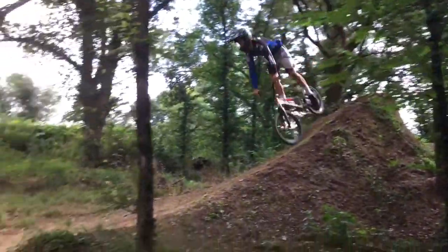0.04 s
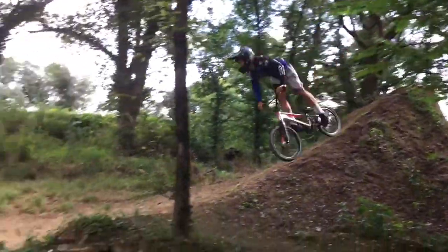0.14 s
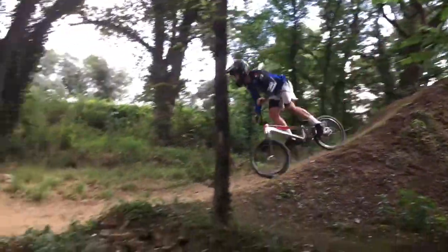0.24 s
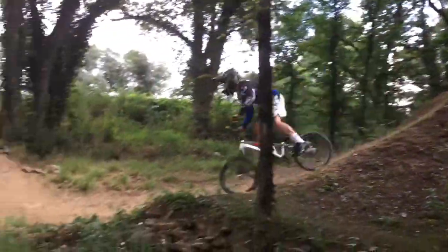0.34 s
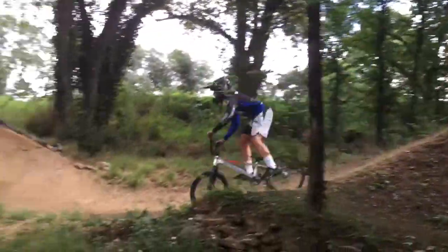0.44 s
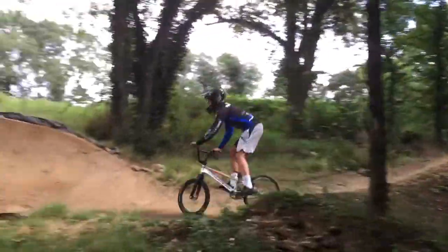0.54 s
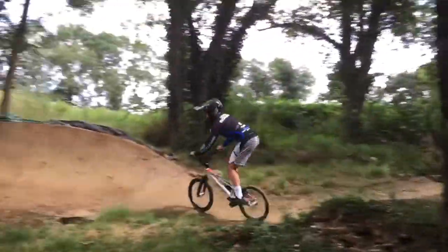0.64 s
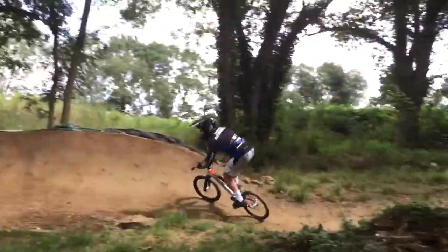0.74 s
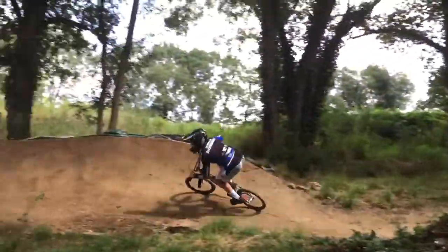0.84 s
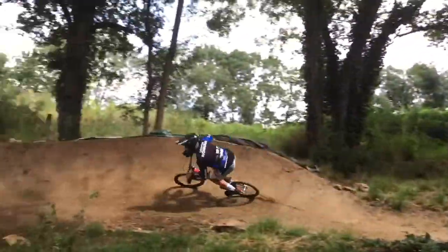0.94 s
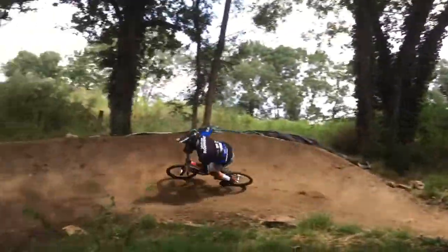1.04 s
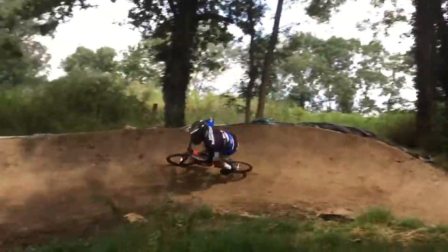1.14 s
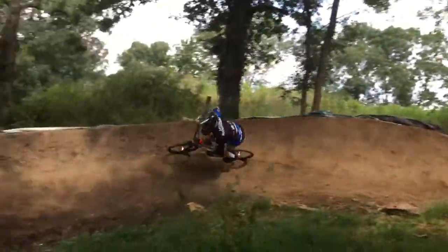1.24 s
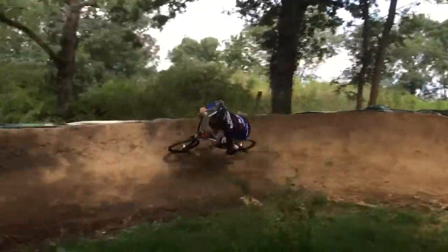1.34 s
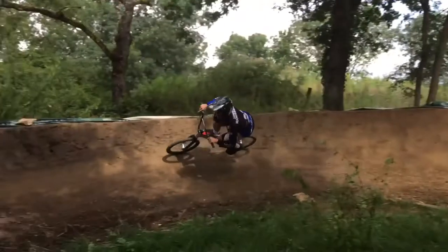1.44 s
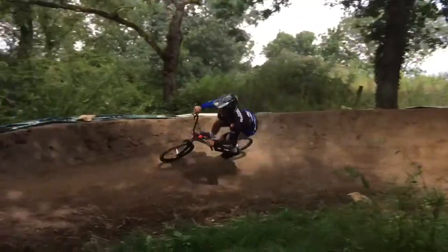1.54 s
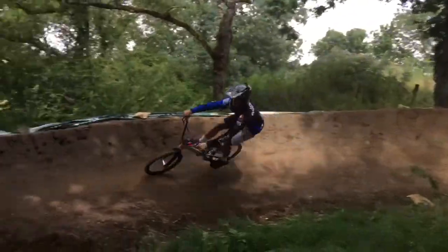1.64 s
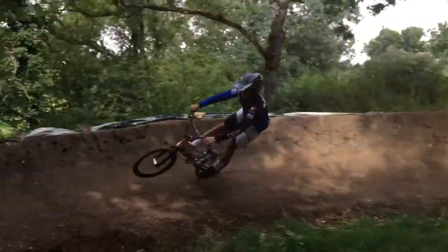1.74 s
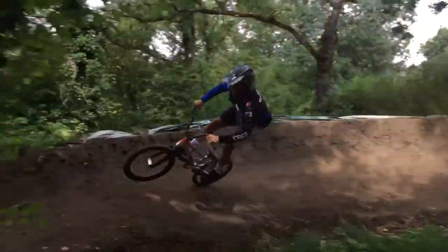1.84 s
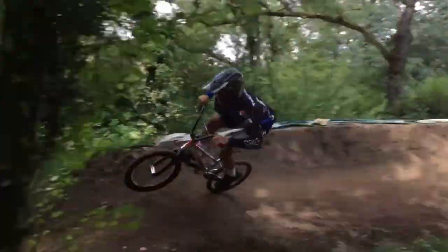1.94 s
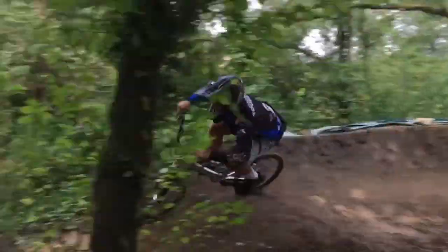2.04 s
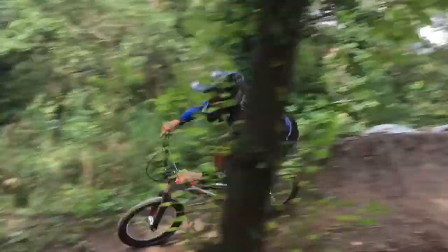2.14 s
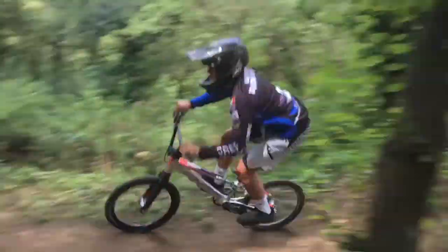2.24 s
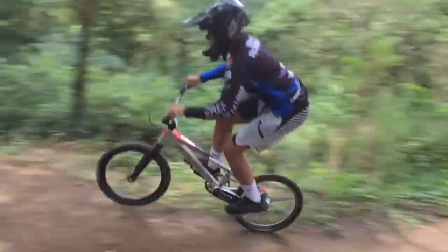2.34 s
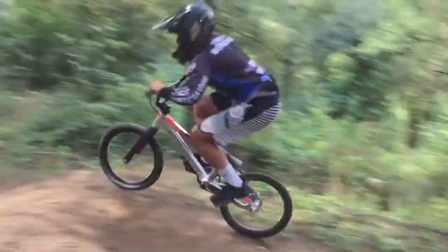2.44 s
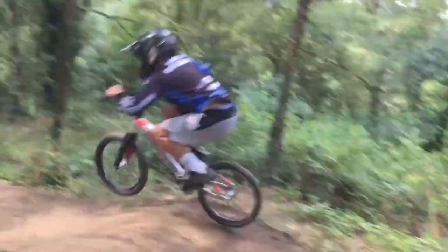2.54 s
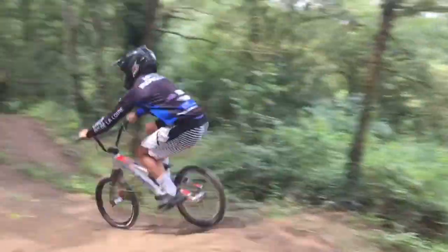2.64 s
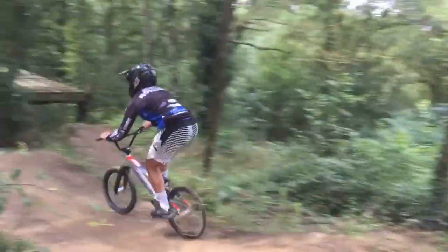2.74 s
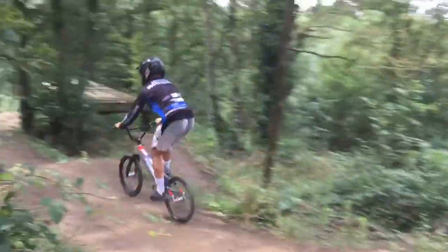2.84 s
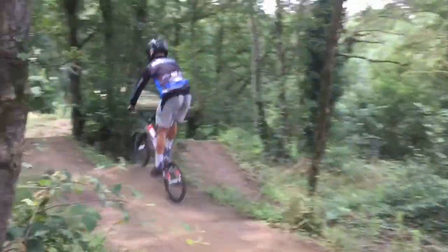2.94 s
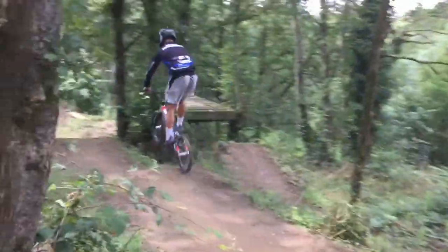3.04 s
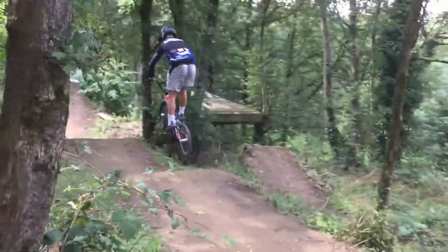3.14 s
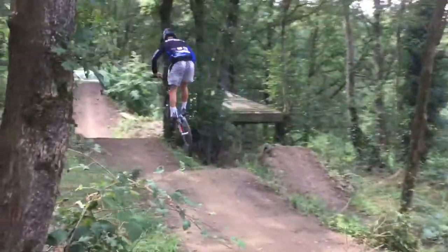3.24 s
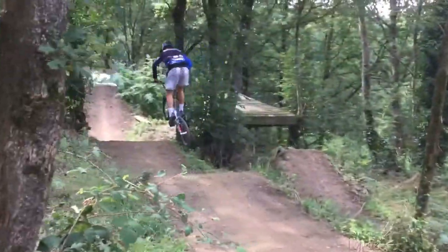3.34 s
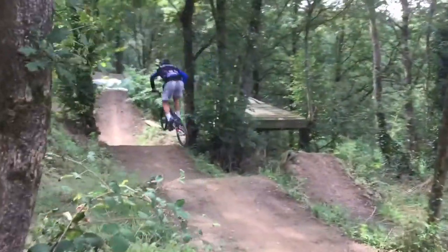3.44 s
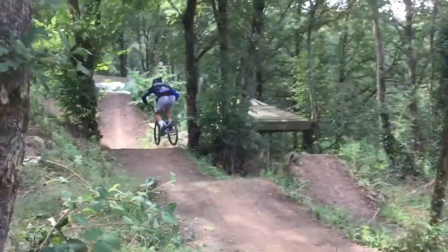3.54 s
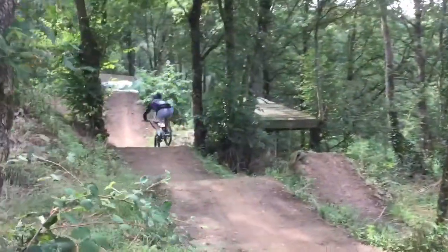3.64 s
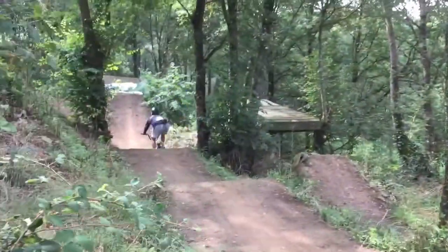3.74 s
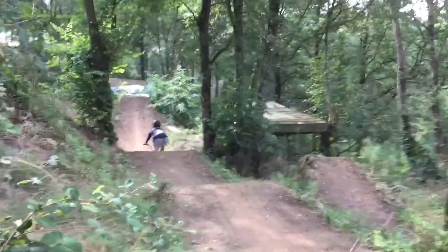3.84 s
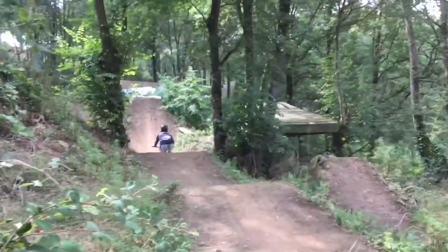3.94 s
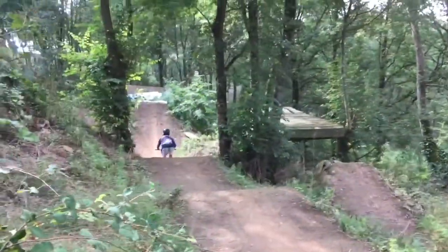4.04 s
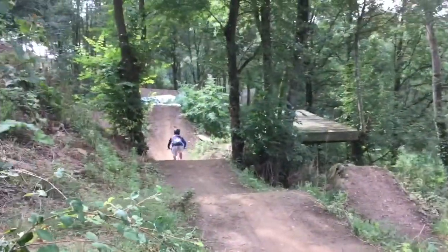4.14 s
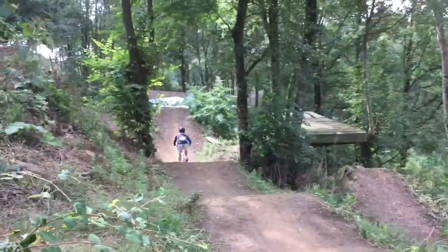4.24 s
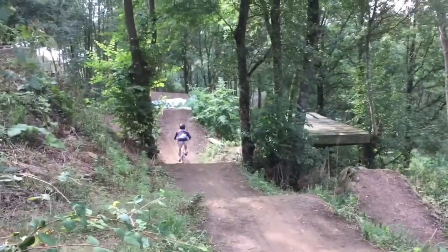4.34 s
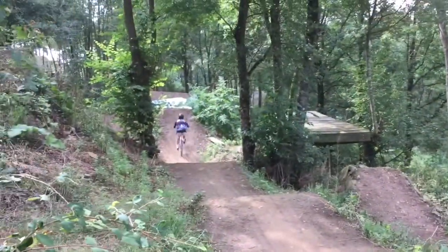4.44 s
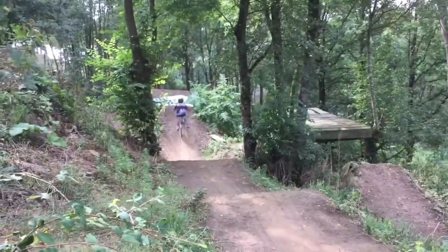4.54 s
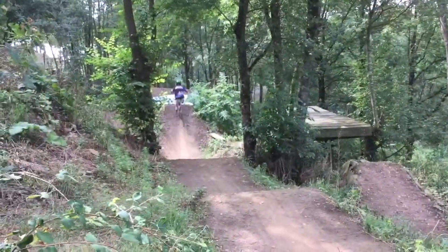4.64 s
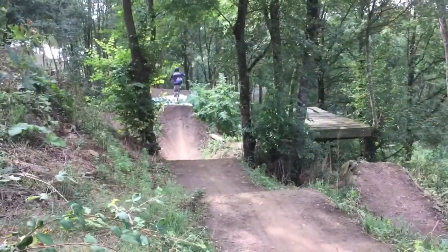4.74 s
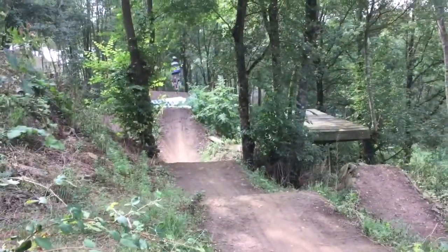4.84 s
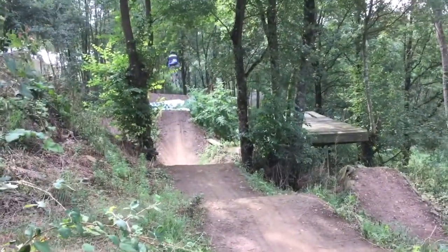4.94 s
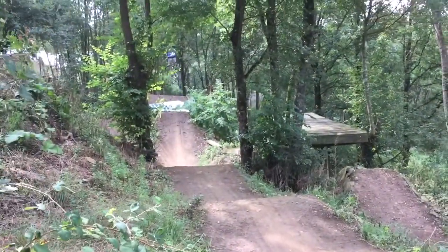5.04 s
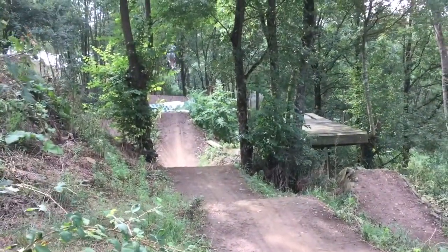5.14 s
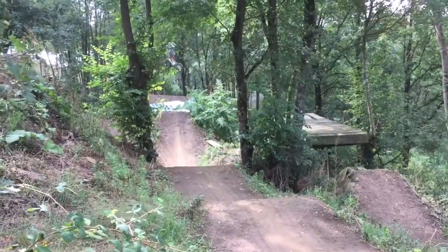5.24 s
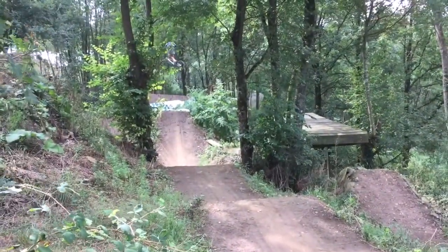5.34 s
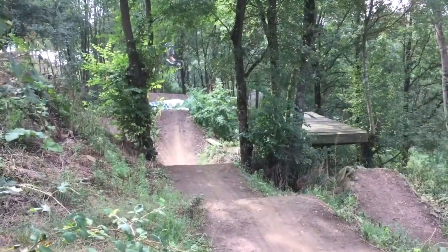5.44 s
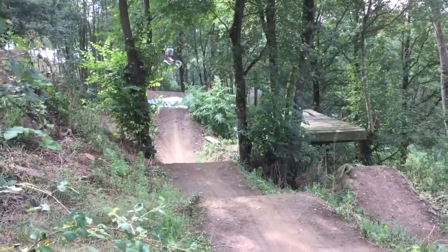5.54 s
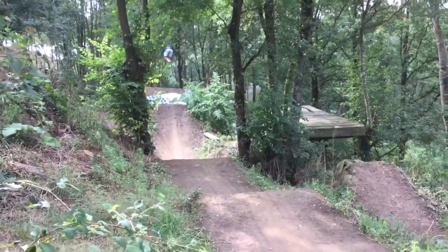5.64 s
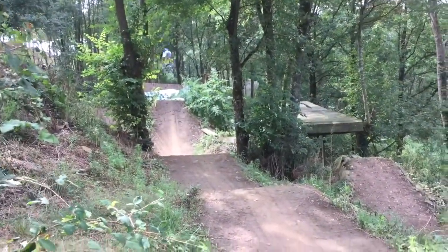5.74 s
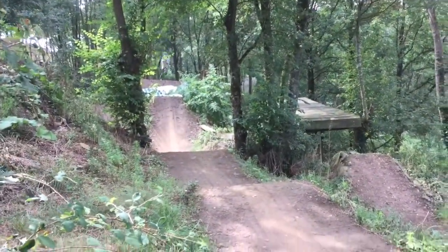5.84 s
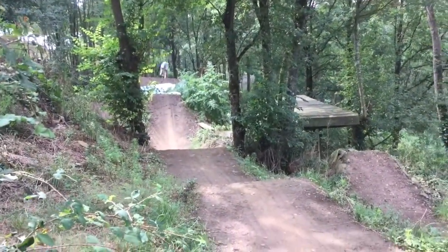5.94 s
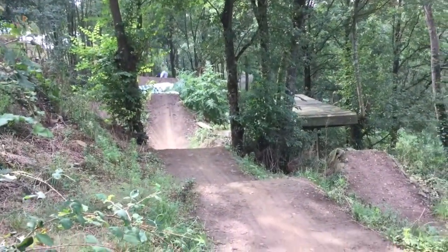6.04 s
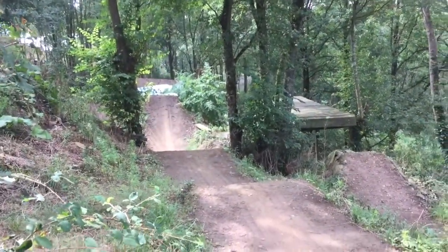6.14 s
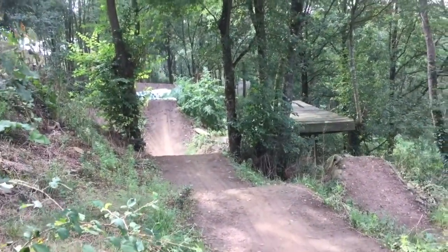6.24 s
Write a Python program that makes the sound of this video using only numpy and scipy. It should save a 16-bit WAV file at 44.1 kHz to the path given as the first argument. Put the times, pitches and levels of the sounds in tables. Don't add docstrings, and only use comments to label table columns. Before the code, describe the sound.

In a quiet wood, a bike lands on packed dirt with a thump and coasts in, freewheel buzzing brightly, tyres rumbling and crunching. Chain and frame clack over bumps. It passes close at its loudest, the buzz dropping in pitch, then hops away over jumps with lighter knocks until only faint leaf hiss remains. One outdoor microphone, slight breeze puffs, dull echoes from trees.

```python
import sys
import numpy as np
from scipy import signal
from scipy.fft import rfft, irfft
from scipy.io import wavfile
from scipy.ndimage import uniform_filter1d

SR = 44100
rng = np.random.default_rng(int(sys.argv[2]) if len(sys.argv) > 2 else 0)


def decibels_to_gain(level_db):
    exponent = np.asarray(level_db, float) / 20
    return 10 ** exponent


def output_pcm(signal):
    pcm = np.clip(np.atleast_2d(signal).T, -1, 1) * 32767
    wavfile.write(sys.argv[1], SR, np.round(pcm).astype(np.int16))


N = 276903
STEP = 32
RIM_FOLLOWS_LOAD = 0.51

# (time [s], ratchet level [dB], hub turned to the microphone [dB], loose dirt thrown up [dB])
PASSING = [(0, -63, 3, 1.5), (.16, -60.5, 5, 4), (.28, -50, -3, -0.5), (.46, -50, 3, 3.5), (.6, -53, 2, 3),
           (1.24, -54, 2, 2), (1.7, -48.5, -1.5, -0.5), (2.1, -52, 3, 3), (2.18, -46.5, 0.5, 3),
           (2.33, -42, -1, -0.5), (3.0, -46, -3, -1), (3.27, -54, 1, 0.5), (3.67, -59, 0.5, 2.5),
           (3.77, -52.5, -2, 1), (3.94, -65, -0.5, 0), (4.31, -74, 6, 7), (4.69, -54.5, -6.5, 2),
           (4.8, -60.5, -3, 5)]
FAR = [
    (4.89, -67.5, -1, 9),
    (4.95, -90, 1, 1),
    (5.35, -95, -4, 2),
    (5.5, -73.5, -16, -4),
    (5.75, -80, -3, -0.5),
    (6.1, -98, -4, 11),
    (6.16, -89, -12, 10),
    (6.23, -81, -11, 11),
    (6.28, -65, -20, 3),
]


def rms_one(x):
    return x / np.sqrt(np.mean(x ** 2) + 1e-20)


def peak_one(x):
    return x / np.abs(x).max()


def add(out, x, s):
    i = round(s * SR)
    out[i:i + len(x)] += x[:N - i]


def in_time(rows):
    s, *columns = np.transpose(rows)
    return [np.interp(np.arange(N) / SR, s, column) for column in columns]


def both(a_db, b_db):
    return 20 * np.log10(np.hypot(decibels_to_gain(a_db), decibels_to_gain(b_db)))


def level(power):
    return np.interp(np.arange(N), np.arange(0, N, STEP), 10 * np.log10(power + 1e-14))


def tent(start, end, rise_db_per_s, fall_db_per_s):
    t = np.arange(0, N, STEP) / SR
    return -rise_db_per_s * np.maximum(start - t, 0) - fall_db_per_s * np.maximum(t - end, 0)


def swells(rows, rises_faster):
    return sum(decibels_to_gain(db + tent(s, s, rises_faster * fade, fade)) ** 2 for s, db, fade in rows)


def drift(rate):
    r = np.exp(-80 * np.pi * rate / SR)
    noise = rng.standard_normal(N // 40 + 2002)
    slow = signal.lfilter([1], [1, -2 * r, r * r], noise)[2000:]
    return np.interp(np.arange(N) / 40, np.arange(len(slow)), rms_one(slow))


def resonance(x, hz, width):
    r = np.exp(-np.pi * width / SR)
    poles = [1, -2 * r * np.cos(2 * np.pi * hz / SR), r * r]
    return signal.lfilter((1 - r * r) / 2 * np.array([1, 0, -1]), poles, x)


def grains(per_s, spread_db):
    sizes = decibels_to_gain(spread_db * np.minimum(rng.exponential(1, N), 4)) * rng.choice([-1, 1], N)
    return rms_one(sizes * (rng.random(N) < per_s / SR)) + 1e-9


def body(drive, modes, flicker_db, flicker_rate):
    total = np.zeros(N)
    for k, (hz, width, db) in enumerate(modes):
        gain = decibels_to_gain(db + flicker_db * drift(flicker_rate))
        total += resonance(drive, hz, width) * gain * (-1) ** k
    return rms_one(total)


def burst(length, chatter):
    size = SR // 8
    fade = decibels_to_gain(-60 * np.arange(size) / SR / np.clip(length, .004, .2))
    drive = chatter * rng.standard_normal(size) * fade
    drive[0] += 1
    return drive


def wood():
    # (frequency [Hz], density [dB per Hz])
    spectrum = [(40, 16), (120, 1), (204, -4.5), (333, -6.5), (368, -2), (416, -6.5), (589, -6), (737, -6),
                (1040, -6.5), (1130, -7), (1570, -12), (1700, -11.5), (15700, -26)]
    hz, db = np.transpose(spectrum)
    grid = np.arange(N // 2 + 1) * SR / N + 1
    shape = decibels_to_gain(np.interp(np.log(grid), np.log(hz), db, left=-90, right=-90))
    return rms_one(irfft(rfft(rng.standard_normal(N)) * shape, N)) * decibels_to_gain(-71)


def freewheel():
    # (time [s], speed towards the microphone [m/s])
    approach = [
        (0, 0),
        (1.4, 2),
        (2.25, 6),
        (2.95, -6),
        (6.28, -6),
    ]
    # (frequency [Hz], width [Hz], level [dB])
    hub_modes = [(5380, 670, -2.5), (6100, 330, -3.5), (6865, 290, 2.5), (8460, 750, -5.5),
                 (9840, 1330, -11)]
    hub_top = [(11280, 660, -6), (12100, 330, -4), (13000, 1030, -7.5), (14440, 210, 3),
               (15330, 1070, -4.5), (15800, 560, -2)]
    hub_low = [(2594, 280, 7), (2320, 440, 2)]
    # (time [s], peak level [dB], fade [dB/s])
    singing = [
        (.1, -61.5, 34),
        (.29, -48, 100),
        (.95, -57.5, 18),
        (2.28, -45, 100),
        (2.73, -52, 200),
        (4.68, -51, 91),
        (6.16, -73, 60),
    ]
    sound_speed = 343
    ratchet_db, top_db, dirt_db = in_time(PASSING + FAR)

    dirt_ring_db = -6.5 + 0.21 * dirt_db
    load_ring_db = RIM_FOLLOWS_LOAD * (load()[0] - ratchet_db) - 8.5
    low_db = both(dirt_ring_db, load_ring_db)
    low_db = both(low_db, level(swells(singing, 1.24)) - ratchet_db)

    teeth_per_s = 170 * decibels_to_gain(0.83 * drift(2.55))
    teeth = np.cumsum(teeth_per_s / SR + 0.0051 * rng.standard_normal(N))
    pawls = decibels_to_gain(0.5 * np.cos(2 * np.pi * teeth))
    drive = grains(12000, 2.3) * pawls
    shell = body(drive, hub_modes, 1.8, 20) + decibels_to_gain(top_db) * body(drive, hub_top, 1.2, 20)
    shell += decibels_to_gain(low_db - 2.0) * body(drive, hub_low, 3.6, 13.5)

    emitted = np.cumsum(1 + in_time(approach)[0] / sound_speed)
    fine = signal.resample_poly(shell, 4, 1)
    return decibels_to_gain(ratchet_db) * np.interp(4 * emitted, np.arange(len(fine)), fine)


def breeze():
    # (time [s], peak level [dB], fade [dB/s])
    gusts = [(.03, -62, 28), (.26, -40, 124), (.44, -50, 250), (.52, -49, 39), (.85, -54, 27),
             (1.06, -52.5, 108), (1.27, -49.5, 200), (1.4, -49, 150), (1.55, -55, 80), (1.7, -54.5, 88),
             (1.82, -48, 152), (2.11, -49, 300), (2.225, -35.5, 202), (2.3, -48, 102), (2.6, -56, 180),
             (2.775, -43.5, 300), (2.89, -49.5, 350), (3.88, -54, 137), (4.07, -62, 120), (4.351, -63, 90),
             (4.6, -60, 104), (4.79, -61, 250), (4.91, -63, 246), (5.04, -65, 350), (5.459, -54, 309),
             (5.55, -62, 200), (5.61, -58.5, 220), (5.97, -64, 208), (6.16, -51.5, 220), (6.26, -47, 600)]
    calm_db, rises_faster = -77.5, 1.97
    puffs = rng.standard_normal(N)
    for hz, width in [(76, 36), (48, 70), (62, 130)]:
        puffs = resonance(puffs, hz, width)
    puffs = rms_one(puffs)
    swing = np.sqrt(uniform_filter1d(puffs ** 2, size=1400) + .1)
    return rms_one(puffs / swing) * decibels_to_gain(level(swells(gusts, rises_faster) + decibels_to_gain(calm_db) ** 2))


def load():
    # (touch time [s], lift time [s], load at touch [dB], load at lift [dB], hollowness [dB])
    contacts = [(0.183, .26, -58, -51, 4), (0.276, 0.623, -46, -47, -6.5), (0.595, 1.188, -50.5, -48.5, 1),
                (1.213, 1.36, -54, -46.5, -3), (1.379, 1.6, -46.5, -52.5, -0.5),
                (1.646, 1.866, -49, -49, 1), (1.896, 2.164, -57, -60, -0.5), (2.2, 2.478, -36.5, -44.5, 0),
                (2.54, 2.62, -75, -58.5, 10), (2.766, 3.04, -43, -48, -1), (3.052, 3.158, -55, -56.5, -2.5),
                (3.18, 3.27, -61, -63, -16), (3.766, 4.103, -57.5, -55, -16.5),
                (4.115, 4.42, -66.5, -60.5, -12.5), (4.429, 4.512, -61.5, -50, -24),
                (4.538, 4.774, -46, -52.5, -14), (6.144, 6.282, -82.5, -61.5, 2.5)]
    # (time [s], peak level [dB], fade [dB/s])
    ripples = [(.25, -47.5, 110), (.41, -40, 150), (.56, -45.5, 80), (1.14, -63, 123), (1.52, -42.5, 116),
               (1.69, -51, 120), (1.82, -45.5, 150), (2.08, -53.5, 90), (2.24, -45.5, 74), (2.44, -50, 150),
               (2.54, -43, 154), (2.62, -47, 209), (2.81, -58, 104), (3.06, -51, 200), (3.12, -63, 200),
               (3.77, -57, 197), (3.95, -55, 250), (4.53, -53.5, 150), (5.02, -68.5, 200), (5.98, -79, 98),
               (4.66, -56.5, 90)]
    touch_db_per_s, lift_db_per_s = 1500, 284
    t = np.arange(0, N, STEP) / SR
    plain, hollow = 0, swells(ripples, 2.02)
    for touch, lift, touch_db, lift_db, hollow_db in contacts:
        press_db = np.interp(t, [touch, lift], [touch_db, lift_db])
        press = decibels_to_gain(press_db + tent(touch, lift, touch_db_per_s, lift_db_per_s)) ** 2
        plain = plain + press
        hollow = hollow + press * decibels_to_gain(hollow_db) ** 2
    return level(plain), level(hollow)


def tyres():
    # (frequency [Hz], width [Hz], level [dB])
    tread_modes = [(468, 26, -2), (573.5, 61, 3.5), (694, 110, 2.5), (846, 270, 0), (1141, 121, -2)]
    rim_modes = [(1378, 218, -1), (1840, 420, 0), (1976, 130, 2)]
    chamber_modes = [(141, 54, 2), (195.4, 20, 9), (243, 41, 3), (303, 596, -4)]
    grit_modes = [(2817, 150, -4.5), (3230, 294, -0.5), (3850, 590, -1.5), (4440, 262, -2),
                  (4790, 230, -13)]
    load_db, hollow_db = load()
    ratchet_db, _, dirt_db = in_time(PASSING + FAR)

    mid_db, tread_follows = -39, 0.89
    free_db = mid_db + tread_follows * (ratchet_db - mid_db)
    rumble_db = both(load_db, free_db - 19)
    hum_db = both(hollow_db, free_db - 23.5)
    rim_loaded_db = ratchet_db + RIM_FOLLOWS_LOAD * (load_db - ratchet_db) - 6.5
    rim_db = both(rim_loaded_db, free_db - 14)
    crunch_db = both(load_db - 8.5, ratchet_db + dirt_db)

    bumps = 1.1 * drift(25)
    stones = grains(3500, 3.2)
    tread = body(stones, tread_modes, 2.0, 14) * decibels_to_gain(rumble_db + bumps)
    rim = body(stones, rim_modes, 1.8, 14) * decibels_to_gain(rim_db + bumps)
    air = body(grains(900, 2.6), chamber_modes, 1.3, 12)
    swing = np.sqrt(uniform_filter1d(air ** 2, size=2000) + .15)
    hum = rms_one(air / swing) * decibels_to_gain(hum_db + .6 * bumps)
    grit = body(grains(7000, 2.6), grit_modes, 1.3, 18) * decibels_to_gain(crunch_db + .6 * bumps)
    return tread + rim + hum + grit


def knocks():
    # (time [s], peak level [dB], ring [Hz], upper modes [dB])
    blows = [(0.184, -44, 825, 5.5), (0.245, -33, 1110, 0), (0.266, -28.5, 910, -0.5),
             (0.282, -30.5, 900, -18), (0.545, -33, 960, -26), (0.665, -40, 684, 2),
             (0.959, -33, 940, -3.5), (1.407, -36.5, 846, 0), (1.587, -38, 820, -9), (1.698, -34, 886, -8),
             (2.099, -36, 960, -13), (2.203, -38.5, 895, 11), (2.577, -47, 574, -11), (3.111, -42, 543, 2),
             (3.765, -37, 720, -4), (3.78, -40, 1000, 4.5), (3.8, -41, 905, -4), (4.064, -51, 460, 7)]
    # (time [s], peak level [dB], ring [Hz], upper modes [dB])
    slaps = [(0.203, -37, 870, -3), (0.392, -34, 655, -5), (0.435, -33, 650, -23), (1.363, -37, 705, -6),
             (1.524, -29, 815, -4), (1.731, -24, 810, -1.5), (2.194, -26.5, 437, -6),
             (2.285, -27.5, 1110, 0.5), (2.766, -34.5, 560, -2), (3.131, -33, 980, -1.5),
             (3.231, -39, 1010, -3.5), (3.429, -45.5, 820, -11), (3.442, -43, 980, -10),
             (3.559, -52, 1050, -7), (3.33, -50.5, 900, -1), (3.695, -55, 1100, -12),
             (3.856, -47, 555, -19), (4.364, -59, 1100, 3)]
    # (time [s], peak level [dB], ring [Hz], upper modes [dB])
    clacks = [
        (0.6, -27.5, 806, -19),
        (0.619, -41, 1090, 2),
        (1.023, -33, 940, -4),
        (1.428, -24, 840, -4),
        (1.949, -33.5, 900, -5),
        (2.007, -31.5, 940, -9),
        (2.296, -23, 796, -2),
        (2.785, -32, 740, 9),
        (3.761, -31.5, 960, -10),
    ]
    # (frequency [Hz], level [dB])
    frame_modes = [(1448, 14.5), (1812, 9.5), (1600, 10), (1064, -4), (2610, 7.5)]
    out = np.zeros(N)
    padding = signal.butter(2, 2600, fs=SR, output="sos")
    for rows, thud_db, length in [(blows, -8, 0.065), (slaps, -16.5, 0.063), (clacks, -19, 0.028)]:
        for s, db, hz, upper_db in rows:
            drive = signal.sosfilt(padding, burst(length, chatter=.09))
            main = resonance(resonance(drive, hz, 330), hz, 330)
            upper = np.zeros(len(drive))
            for f, mode_db in frame_modes:
                strength_db = mode_db + rng.normal(0, 2.5)
                upper += resonance(resonance(drive, f, 237), f, 420) * decibels_to_gain(strength_db)
            thud = resonance(resonance(drive, 272, 170), 82, 220)
            knock = peak_one(main) + decibels_to_gain(upper_db) * peak_one(upper) + decibels_to_gain(thud_db) * peak_one(thud)
            add(out, decibels_to_gain(db) * knock, s)
    return out


def snaps():
    # (time [s], peak level [dB], ring [Hz], length [s], bright edge [dB])
    cracks = [(0.2445, -31, 2920, 0.022, -14), (1.8594, -41, 3480, 0.02, 5), (1.928, -36, 4500, 0.008, 3),
              (1.9475, -31, 3440, 0.008, 0), (2.0053, -44, 3150, 0.017, 5), (2.2124, -23, 3370, 0.014, -15),
              (3.4466, -32.5, 2850, 0.017, -30), (5.005, -50, 3360, 0.04, -8),
              (5.0115, -54, 2800, 0.038, -1), (5.689, -57, 900, .006, -4), (5.733, -57, 1500, 0.0073, -9)]
    out = np.zeros(N)
    for s, db, hz, length, bright_db in cracks:
        drive = burst(length, chatter=0.3)
        low_ring = resonance(resonance(drive, hz, 1000), hz, 1300)
        high_ring = resonance(resonance(drive, 1.56 * hz, 1000), 1.56 * hz, 1300)
        rings = low_ring + decibels_to_gain(bright_db / 2) * high_ring
        edge = sum(resonance(resonance(drive, f, 1500), f, 2500) for f in (9600., 13600.))
        add(out, decibels_to_gain(db) * (peak_one(rings) + decibels_to_gain(bright_db) * peak_one(edge)), s)
    return out


def trees(x):
    # (delay [s], level [dB])
    echoes = [(.006, -12), (.023, -20.5), (.041, -17), (.067, -17.5)]
    dull = signal.sosfilt(signal.butter(2, 3500, fs=SR, output="sos"), x)
    out = x.copy()
    for s, db in echoes:
        add(out, decibels_to_gain(db) * dull, s)
    return out


def scene():
    mono = wood() + freewheel() + breeze() + tyres() + trees(knocks() + snaps())
    return np.array([mono, mono])


def band_limit(x):
    return signal.sosfilt(signal.butter(12, 16340, fs=SR, output="sos"), x)


def record(dry):
    cut = signal.sosfilt(signal.butter(2, 35, "high", fs=SR, output="sos"), dry)
    mix = signal.sosfilt(signal.cheby2(20, 70, 15950, fs=SR, output="sos"), cut)
    return band_limit(mix)


dry = scene()
out = record(dry)
output_pcm(out)
```